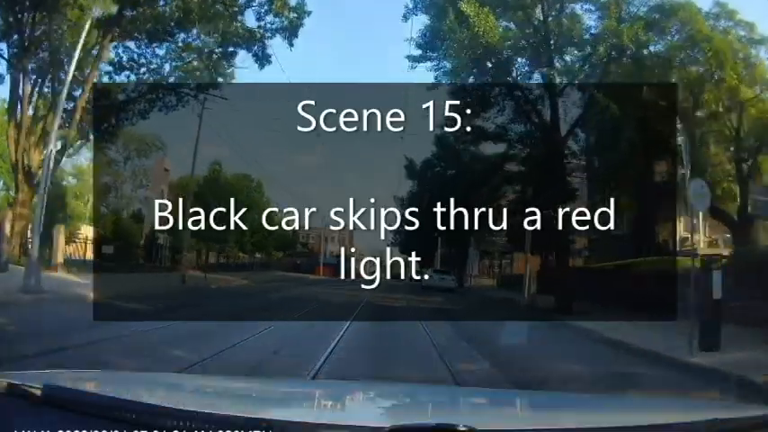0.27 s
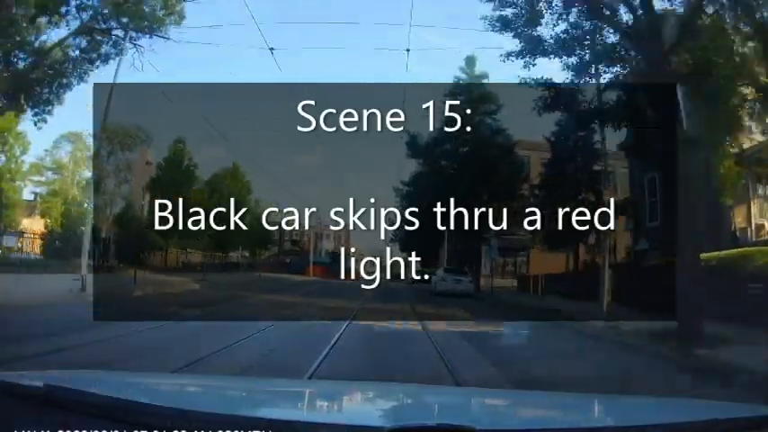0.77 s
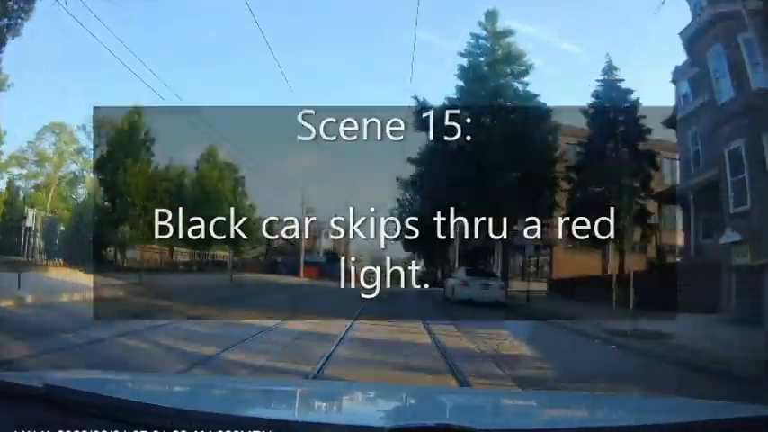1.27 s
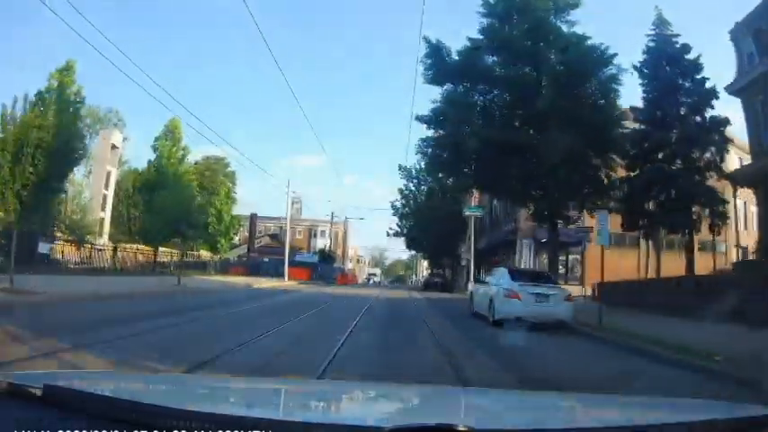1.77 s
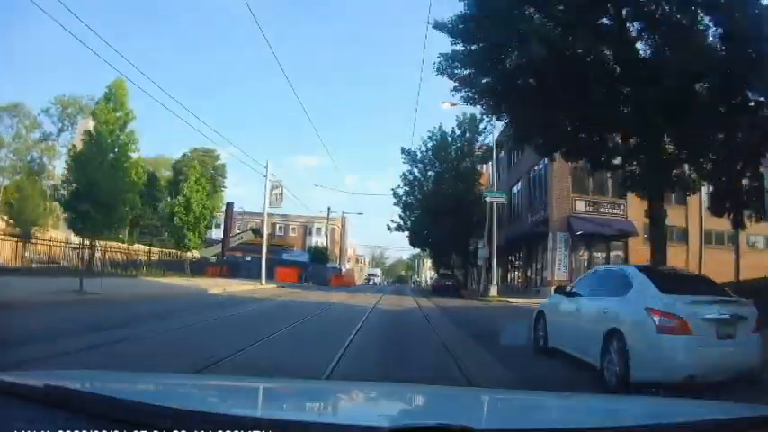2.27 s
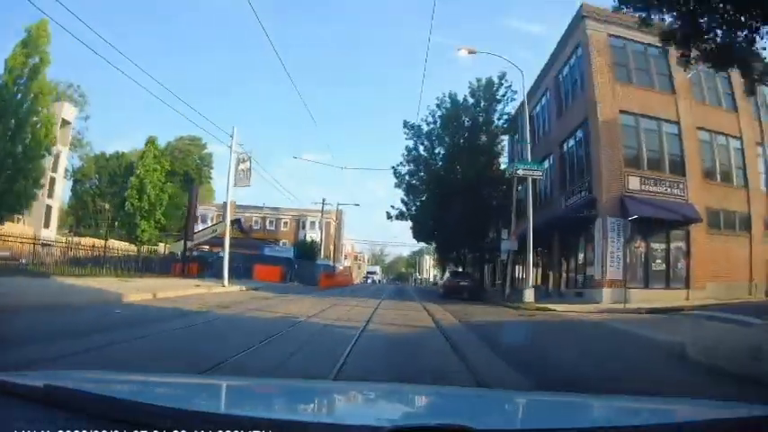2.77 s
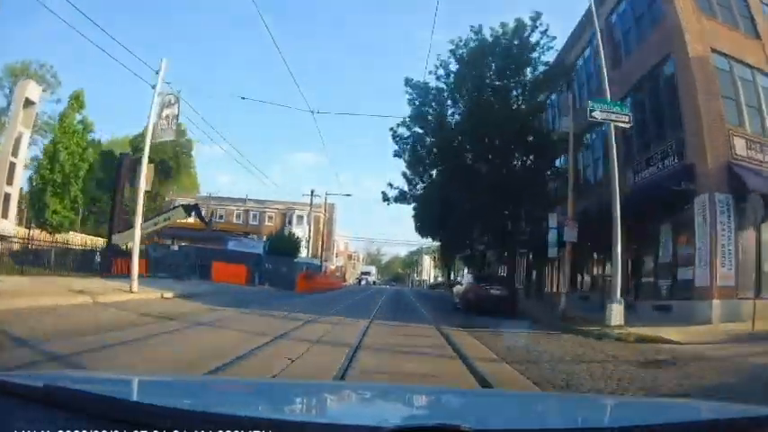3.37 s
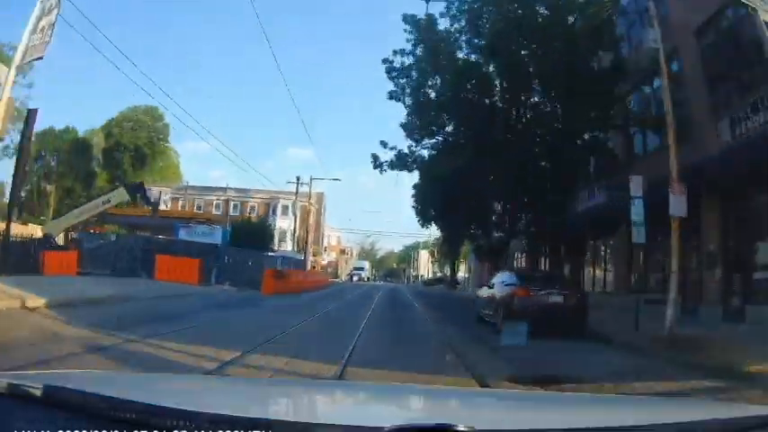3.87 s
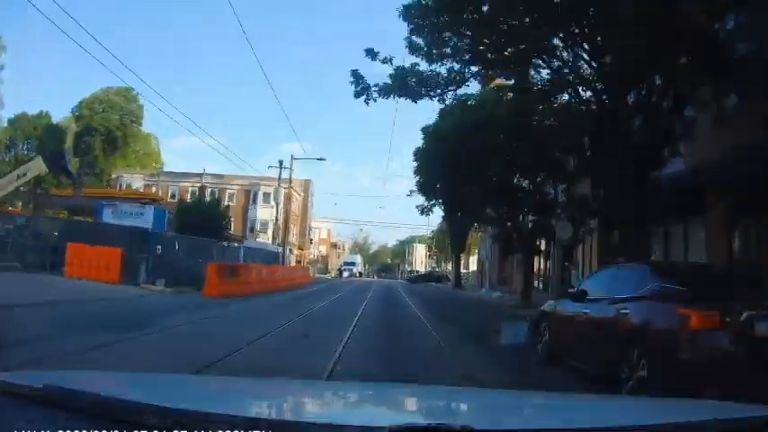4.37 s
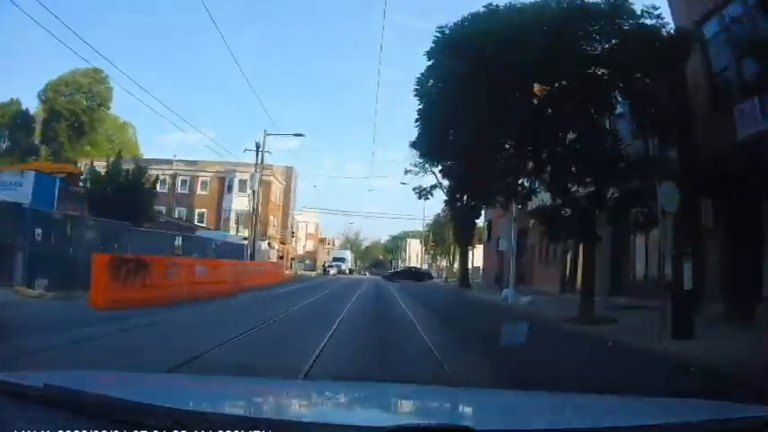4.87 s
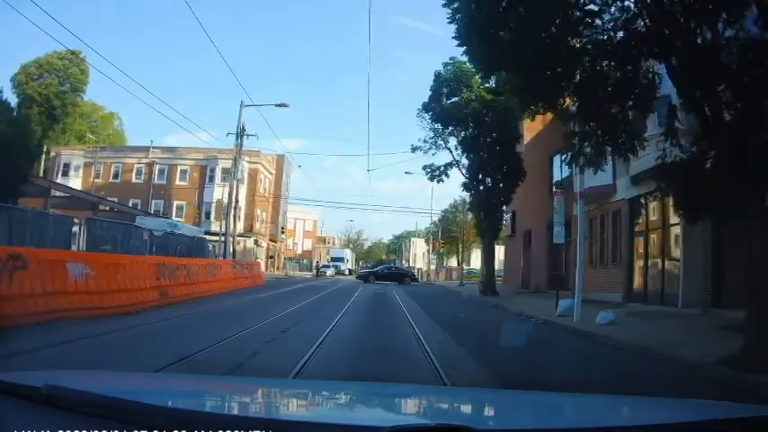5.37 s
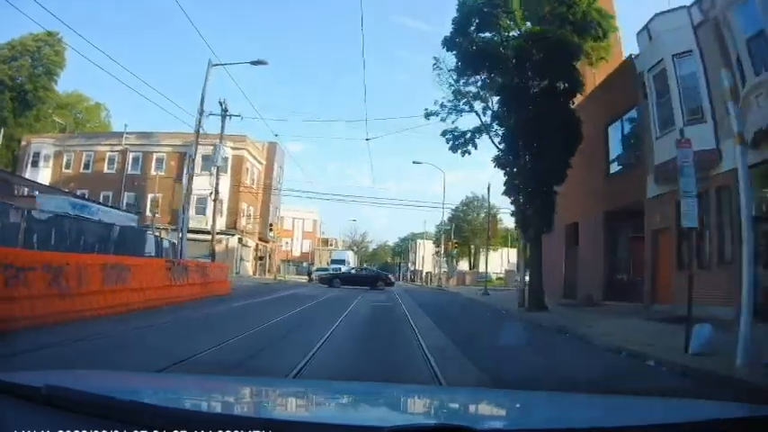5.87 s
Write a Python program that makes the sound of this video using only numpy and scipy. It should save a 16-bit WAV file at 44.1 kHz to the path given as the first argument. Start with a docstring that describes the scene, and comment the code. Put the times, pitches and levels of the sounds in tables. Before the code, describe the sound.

Heard from a dashboard microphone inside a car driving along a city street: deep rumble and droning tyre noise, with small plastic ticks. A tiny dropout comes early on, then the paving roughens, wheels judder, trim knocks and one suspension thump booms. The road smooths, and a two-note horn starts and holds to the end. A faint high electronic whine and hiss run throughout.

```python
"""A car drives along a city street, heard from inside: booming and roaring noises grow over rough paving.
The wheels judder, a suspension thump rings, and loose trim knocks and ticks.
Near the end two horns start together and hold: sums of wavering tones with a rasp of ringing noise.
A dashboard camera adds a faint whine, its pitch path repeating with every picture, over a thin hiss."""
import sys
import numpy as np
from scipy import signal
from scipy.fft import rfft, irfft
from scipy.io import wavfile
from scipy.ndimage import uniform_filter1d

SR = 44100
rng = np.random.default_rng(int(sys.argv[2]) if len(sys.argv) > 2 else 0)


def generate_wav(sig):
    """Save sig (samples, or channels by samples) to the path in sys.argv[1] as 16-bit PCM at SR."""
    pcm = np.round(np.clip(np.atleast_2d(sig).T, -1, 1) * 32767).astype(np.int16)
    wavfile.write(sys.argv[1], SR, pcm)


N = 270774

# Shapes of the road noises: pitch_hz, relative level_db (per Hz)
RUMBLE_SPECTRUM = [(15, -16.5), (22, -4.5), (30, -1), (39, -4), (51, 6), (59, -14), (80, -17)]
DRONE_SPECTRUM = [(55, -9.5), (76, 2), (108, -8), (131, 1), (152, -8.5), (170, -6.5), (185, -11),
                  (210, -8.5), (260, -16.5), (350, -23.5), (520, -40)]
ROAR_SPECTRUM = [(240, -5.5), (330, 3), (400, 1), (480, 0.5), (520, -2), (640, -2.5), (720, -14),
                 (900, -22)]
TREAD_SPECTRUM = [(600, -8), (780, 2), (950, 3), (1200, -1.5), (1500, -2.5), (1850, -17.5), (2350, -21.5),
                  (3000, -32.5), (4500, -55)]
GRIT_SPECTRUM = [(2600, -1), (3200, 2.5), (4000, -0.5), (4800, -1.5), (6000, -9), (8000, -18),
                 (12000, -27.5)]
# Coarseness of the paving, which drives the road noise: time_s, coarseness_db (above smooth asphalt)
PAVING = [(0.0, -1), (1.4, 1), (2.25, 5), (2.7, 8.5), (3.5, 7), (4.4, 7), (4.85, 7.5), (5.2, 1.5),
          (6.14, 1.5)]
# How each layer follows the road: base level_db, share of coarseness followed (below 0 means it softens),
# crossing lift_db; heaves, patches and crunches then vary the level
RUMBLE_LAW = (-31.5, 0.59, 1.44)
DRONE_LAW = (-39, 0.52, -0.3)
ROAR_LAW = (-52, -0.16, 1.8)
TREAD_LAW = (-59.5, 1, 0)
GRIT_LAW = (-81.5, 0.41, 4.5)
BUZZ_LAW = (-75.5, 0.39, 3.6)
FAINT_TICK_LAW = (-58.5, 0.55, 4.3)
# Bumps that set the car heaving: middle_s, length_s, rumble lift_db, drone lift_db
BUMPS = [(0.94, 0.72, 2, 4), (1.577, 0.17, 4.5, -1.5), (2.049, 0.12, 4.5, -5), (2.509, 0.18, 9, 0.5),
         (2.782, .14, 4.5, 1.5), (2.96, 0.18, 4.5, 1), (3.243, 0.17, 3.5, 2), (4.976, 0.32, 2.5, 2),
         (5.63, 0.22, 1, 2), (5.98, .36, 7.5, 1.5)]
# Suspension thumps: start_s, peak_db
THUMPS = [(4.2367, -19)]
# Loose trim knocking, and the loudest small plastic ticks: start_s, peak_db, brightness_db (per octave)
KNOCKS = [(2.958, -38.5, 10), (3.645, -38, -38), (3.674, -31.5, -5), (3.887, -35.5, 3), (4.120, -37, -29),
          (4.329, -33.5, -10), (4.843, -32.5, 0), (4.865, -36.5, 2), (5.068, -36.5, 1)]
LOUD_TICKS = [(.297, -50.5, -6), (.988, -54, -9), (1.992, -51, -1), (2.371, -53.5, -2), (2.603, -46.5, -9),
              (3.268, -49, -12), (3.305, -46.5, -11), (3.356, -49, -3), (4.088, -42.5, -9),
              (4.693, -49, -2), (4.89, -48.5, 2), (4.929, -47.5, 1), (5.264, -57, 11), (5.285, -54, 5),
              (5.319, -52, 4)]
# How cabin air, trim and small plastic parts ring: pitch_hz, relative level_db, time to fall 60 dB_s
THUMP_MODES = [(126.4, -0.5, 0.31), (135.1, 5.5, 0.43), (200, 4.5, 0.05)]
TRIM_MODES = [(453, -2, 0.1), (595, 0.5, 0.048), (646, -0.5, 0.062), (795, 0, 0.089), (976, -2.5, 0.11),
              (1114, -15, 0.16), (1320, -4, 0.028)]
TICK_MODES = [(2020, 8.5, 0.019), (2395, 6.5, 0.012), (3020, 0.5, 0.011), (3520, -4.5, 0.0091),
              (4180, -8, .01), (4720, 3, 0.021), (5720, 0, .008), (6530, -3.5, .008)]
# Tones within each horn: multiple of its pitch, relative level_db
LOW_HORN = [(1, 4.5), (2, -17), (3, -16.5), (4, -23.5), (5, -21), (6, -20.5), (7, -22.5), (8, -43),
            (9, -44), (10, -51), (11, -49.5), (12, -55.5), (13, -53), (14, -63.5), (15, -62), (16, -58)]
HIGH_HORN = [(1, 1), (2, 2), (3, -19), (4, -24.5), (5, -32.5), (6, -24), (7, -32.5), (8, -43), (9, -41.5),
             (10, -57.5), (11, -52), (12, -60), (13, -54), (14, -66.5), (15, -58.5), (16, -57.5)]
# Side tones as the horns shake each other and their bracket: pitch_hz, level_db (before a 1.5 dB lift)
SIDE_TONES = [(334.25, -62.5), (562.0, -55), (930.1, -46.5), (1351.55, -56.5)]
# Resonances of the horns' rasp: pitch_hz, width_hz, relative level_db
RASP = [(497, 210, -3), (1007, 52, 2.5), (1270, 110, -11.5), (1536, 320, -7), (2112, 58, -9.5),
        (2500, 260, -14), (3005, 190, -16), (3440, 1500, -19.5), (5430, 3000, -26.5)]
# Camera whine within one picture: share of the cycle, pitch_hz, relative level_db, unsteadiness (share of pitch)
WHINE = [(0, 13180, -5, .004), (.35, 13000, 3.5, 0.0037), (.37, 11300, -6.5, .045), (.55, 10750, -4.5, .04),
         (.73, 10500, -7, .035), (.75, 11770, -0.5, .012), (.98, 11800, -5.5, .006),
         (1, 12800, -7.5, 0.0043)]
# Shape of the camera's hiss: pitch_hz, relative level_db (per Hz)
HISS_SPECTRUM = [(3000, 0), (9000, -1.2), (12000, 1.0), (16500, 0)]
# The level dips briefly: start of fade_s, almost silent_s, start of return_s, full again_s
DIP_TIMES = (1.83, 1.85, 1.864, 1.895)

# Rough crossing: start of rolling on, start of rolling off, and how long each takes
CROSSING_FROM_S, CROSSING_TO_S, CROSSING_EDGE_S = 3.02, 4.09, 0.27
# The judder is strongest at JUDDER_S and fades evenly on both sides
JUDDER_S, JUDDER_DB, JUDDER_FADE_DB_PER_S = 3.8, -31, 69.5
# Chance ticks: average rate, brightness per octave, and random spread up or down
FAINT_TICKS_PER_S, FAINT_TICK_BRIGHT_DB, FAINT_TICK_SPREAD_DB = 4.5, -5, 2.0
LOW_HZ, HIGH_HZ, HORN_ON_S = 421.45, 508.65, 5.321
FLUTTER_DB = 3   # wavering that the highest horn tones approach; the lowest tone has none
PICTURES_PER_S, FIRST_PICTURE_S = 29.97, .007
CUTOFF_HZ = 15830


def road():
    """Bumps shake the body and cabin air; the tread roars and crunches on the paving, and the dashboard buzzes."""
    rumble_lift_db, drone_lift_db = heaves()
    patches = drift(25)   # coarse patches raise tread and grit together
    rumble = evened(coloured(RUMBLE_SPECTRUM), span_s=0.11)
    rumble = from_db(road_db(RUMBLE_LAW) + rumble_lift_db) * rumble
    drone = evened(coloured(DRONE_SPECTRUM), span_s=0.19)
    drone = from_db(road_db(DRONE_LAW) + drone_lift_db) * drone
    roar = from_db(road_db(ROAR_LAW)) * coloured(ROAR_SPECTRUM)
    tread = from_db(road_db(TREAD_LAW) + 1.8 * patches) * coloured(TREAD_SPECTRUM)
    grit = crunches(per_s=50, decay_s=0.011, depth=1.0) * coloured(GRIT_SPECTRUM)
    grit = from_db(road_db(GRIT_LAW) + 1.1 * patches) * grit
    buzz = crunches(per_s=41, decay_s=0.0082, depth=1.23) * ringing_noise(hz=2210, width_hz=700)
    buzz = from_db(road_db(BUZZ_LAW)) * buzz
    return rumble + drone + roar + tread + grit + buzz


def road_db(law):
    """Coarser paving changes a layer's level by its own share, and the crossing adds its own lift."""
    base_db, follows, crossing_db = law
    time_s, coarseness_db = np.transpose(PAVING)
    coarseness_db = np.interp(seconds(), time_s, coarseness_db)
    on_crossing = swell(CROSSING_FROM_S, CROSSING_EDGE_S) - swell(CROSSING_TO_S, CROSSING_EDGE_S)
    return base_db + follows * coarseness_db + crossing_db * on_crossing


def heaves():
    """Each bump changes rumble and drone in one smooth hump, given in dB."""
    lifts_db = np.zeros((2, N))
    for middle_s, length_s, rumble_db, drone_db in BUMPS:
        half_s = length_s / 2
        hump = swell(middle_s - half_s, half_s) - swell(middle_s, half_s)
        lifts_db += np.outer([rumble_db, drone_db], hump)
    return lifts_db


def crunches(per_s, decay_s, depth):
    """Loudness of small random bursts that start sharply and die away, over a steady bed."""
    strength = np.minimum(rng.exponential(1, N), 2.5)
    born = (rng.random(N) < per_s / SR) * strength
    fade = np.exp(-1 / (decay_s * SR))   # what is left after each sample
    return 1 + depth * signal.lfilter([1], [1, -fade], born + 1e-18)


def rattles():
    """The wheels judder, the suspension thumps, and the trim knocks and ticks."""
    judder_db = JUDDER_DB - JUDDER_FADE_DB_PER_S * np.abs(seconds() - JUDDER_S)
    judder = from_db(judder_db) * evened(ringing_noise(hz=86.8, width_hz=49), span_s=0.19)
    knocks = struck(KNOCKS, TRIM_MODES, chatter_s=0.0069, soft_hz=1380)
    ticks = struck(list(LOUD_TICKS) + faint_ticks(), TICK_MODES, chatter_s=0.0046, soft_hz=6460)
    return judder + thumps(contact_s=0.0037) + knocks + ticks


def thumps(contact_s):
    """A soft blow through the suspension sets the cabin air booming in fading tones."""
    out = np.zeros(N)
    for start_s, peak_db in THUMPS:
        t = np.maximum(seconds() - start_s, 0)
        boom = np.zeros(N)
        for hz, level_db, t60_s in THUMP_MODES:
            fading_db = level_db - 60 * np.minimum(t / t60_s, 5)
            boom += from_db(fading_db) * np.sin(2 * np.pi * hz * t)
        boom *= 1 - np.exp(-t / contact_s)   # soft start
        out += from_db(peak_db) * boom / np.abs(boom).max()
    return out


def struck(events, modes, chatter_s, soft_hz):
    """Each blow is a short chattering contact, dull above soft_hz, that rings every mode."""
    out, t = np.zeros(N + SR), np.arange(SR // 2) / SR
    softness = signal.butter(4, min(soft_hz, SR / 3), fs=SR, output="sos")
    for start_s, peak_db, bright_db in events:
        blow = np.zeros(len(t))
        for hz, level_db, t60_s in modes:
            contact = rng.standard_normal(len(t)) * np.exp(-t / chatter_s) + 1e-18
            width_hz = np.log(1000) / (np.pi * t60_s)   # longer ringing means a narrower resonance
            ring = rms_one(resonate(contact, hz, width_hz))
            blow += from_db(level_db + bright_db * np.log2(hz)) * ring
        blow = signal.sosfilt(softness, blow)
        start = int(start_s * SR)
        out[start:start + len(t)] += from_db(peak_db) * blow / np.abs(blow).max()
    return out[:N]


def faint_ticks():
    """Loosely spaced chance ticks whose strength follows the road, listed like the loud ones."""
    gap_chance, level_chance = rng.random((2, 60))
    start_s = np.cumsum(2 * gap_chance) / FAINT_TICKS_PER_S
    peak_db = np.interp(start_s, seconds(), road_db(FAINT_TICK_LAW))
    peak_db += FAINT_TICK_SPREAD_DB * (2 * level_chance - 1)
    return [(s, db, FAINT_TICK_BRIGHT_DB) for s, db in zip(start_s, peak_db) if s < N / SR]


def horns():
    """Two horns about a minor third apart; uneven strokes leave a rasp in the trumpets and car body."""
    low = horn(LOW_HZ, LOW_HORN, level_db=-28.0, wander=0.00023, jitter=.0012)
    high = horn(HIGH_HZ, HIGH_HORN, level_db=-29.0, wander=0.00017, jitter=.0012)
    side = np.zeros(N)
    for hz, level_db in SIDE_TONES:
        side += from_db(level_db) * np.sin(2 * np.pi * (hz * seconds() + .03 * drift(6.3)))
    rasp = sum(from_db(level_db) * ringing_noise(hz, width_hz) for hz, width_hz, level_db in RASP)
    extras = from_db(1.5) * side + from_db(-44.5) * rasp
    return low + high + swell(HORN_ON_S, rise_s=0.037) * extras


def horn(pitch_hz, partials, level_db, wander, jitter):
    """A buzzing diaphragm with uneven strokes; its upper tones come in slightly later and waver."""
    # wander is a share of the pitch; jitter is a share of one stroke
    cycles = np.cumsum(pitch_hz * (1 + wander * drift(3.7))) / SR + jitter * drift(60)
    out = np.zeros(N)
    for k, partial_db in partials:
        onset = swell(HORN_ON_S + 0.034 * (1 - 1 / k) ** 4, rise_s=0.029)
        flutter_db = FLUTTER_DB * (1 - 1 / k) ** 2 * drift(5.0)
        tone = np.sin(2 * np.pi * (k * cycles + rng.random()))
        out += onset * from_db(partial_db + flutter_db) * tone
    return from_db(level_db) * out


def camera():
    """The power supply's whine shifts pitch with the load of each picture, wandering quickly, over a hiss."""
    share, *columns = np.transpose(WHINE)
    place = (seconds() - FIRST_PICTURE_S) * PICTURES_PER_S % 1   # place within the picture, 0 to 1
    hz, level_db, unsteady = (np.interp(place, share, column) for column in columns)
    pitch_hz = hz * (1 + unsteady * drift(220))
    tone = np.sin(2 * np.pi * np.cumsum(pitch_hz) / SR)
    whine = from_db(level_db - 67.0 + 1.5 * drift(20)) * tone
    return whine + from_db(-75) * coloured(HISS_SPECTRUM)


def coloured(spectrum):
    """Noise with the given spectrum, falling steeply past its ends; average strength (rms) 1."""
    hz, level_db = np.transpose(spectrum)
    bins = np.maximum(np.fft.rfftfreq(N, 1 / SR), 1)
    skirts = np.minimum(1, np.minimum(bins / hz[0], hz[-1] / bins)) ** 4
    gain = skirts * from_db(np.interp(np.log(bins), np.log(hz), level_db))
    return rms_one(irfft(rfft(rng.standard_normal(N)) * gain, N))


def ringing_noise(hz, width_hz):
    """Random shaking heard through the same resonance twice; rms 1."""
    once = resonate(rng.standard_normal(N), hz, width_hz)
    return rms_one(resonate(once, hz, width_hz))


def resonate(x, hz, width_hz):
    """A resonance strengthens sound near one pitch; gain about 1 at its top."""
    r = np.exp(-np.pi * width_hz / SR)
    feed = np.array([1, 0, -1]) * (1 - r * r) / 2
    feedback = [1, -2 * r * np.cos(2 * np.pi * hz / SR), r * r]
    return signal.lfilter(feed, feedback, x)


def evened(x, span_s):
    """Hold the slow level of a noise steady, keeping its quick lumps."""
    power = uniform_filter1d(x ** 2, max(int(span_s * SR), 2))
    return x / np.sqrt(power + 1e-9)


def drift(rate):
    """Random wander with spread about 1; a higher rate (Hz) wanders faster."""
    r = np.exp(-40 * np.pi * rate / SR)   # made at every 20th sample
    noise = rng.standard_normal(N // 20 + 4002)
    slow = signal.lfilter([1], [1, -2 * r, r * r], noise)[4000:]   # skip the settling time
    return np.interp(np.arange(N) / 20, np.arange(len(slow)), rms_one(slow))


def swell(start_s, rise_s):
    """Rises smoothly from 0 to 1."""
    return .5 - .5 * np.cos(np.pi * np.clip((seconds() - start_s) / rise_s, 0, 1))


def seconds():
    """Time of every sample."""
    return np.arange(N) / SR


def from_db(db):
    """Decibels to gain."""
    return 10 ** (np.asarray(db) / 20)


def rms_one(x):
    """Scale to an average strength (rms) of 1."""
    return x / np.sqrt(np.mean(x ** 2) + 1e-20)


def scene():
    """Everything as it reaches the windscreen, with one brief dip in level."""
    dip = np.interp(seconds(), DIP_TIMES, [1, 0, 0, 1]) ** 2
    mix = road() + rattles() + horns() + camera()
    return (mix * (dip + 0.0037))[None]   # a trace remains in the dip


def record(dry):
    """A steep filter removes the treble above CUTOFF_HZ."""
    top_cut = signal.ellip(12, .1, 80, CUTOFF_HZ, fs=SR, output="sos")
    return signal.sosfilt(top_cut, dry)


dry = scene()
out = record(dry)
generate_wav(out)
```